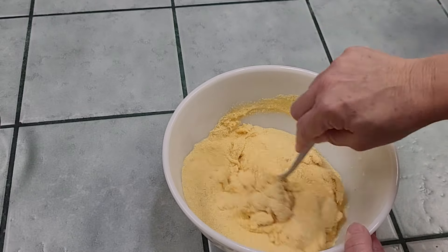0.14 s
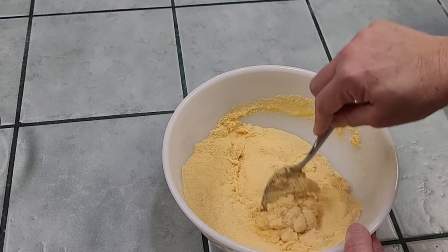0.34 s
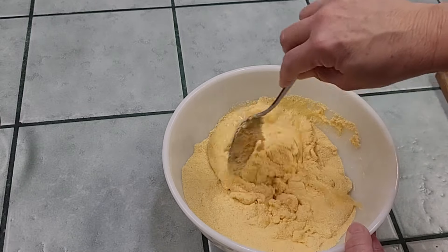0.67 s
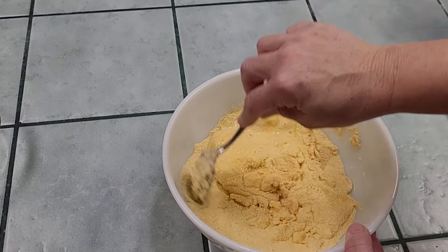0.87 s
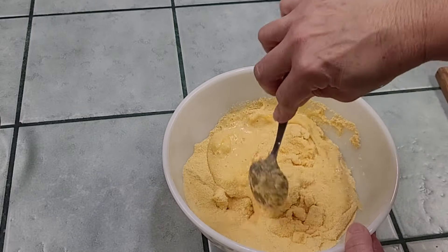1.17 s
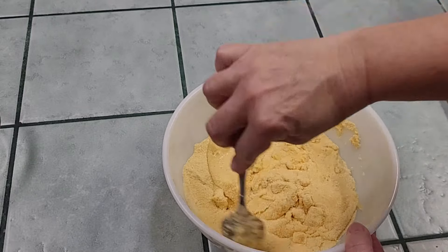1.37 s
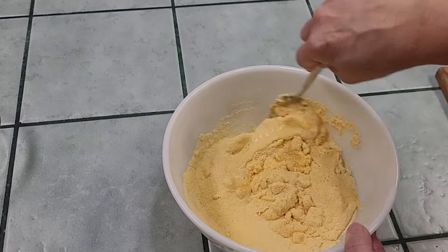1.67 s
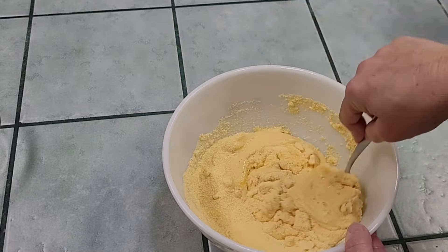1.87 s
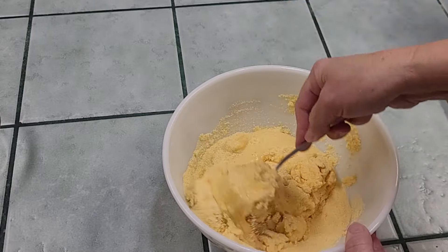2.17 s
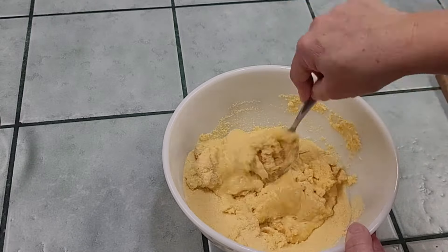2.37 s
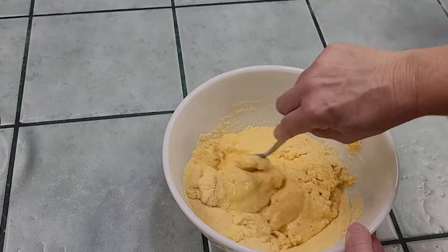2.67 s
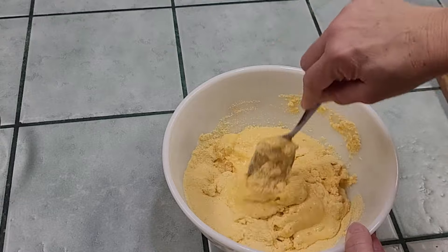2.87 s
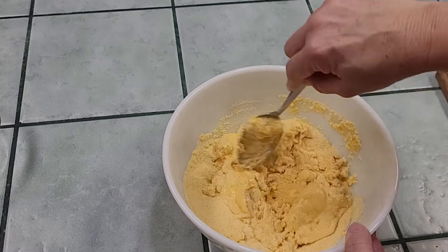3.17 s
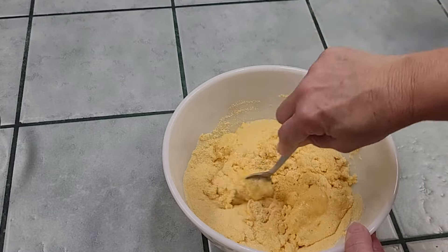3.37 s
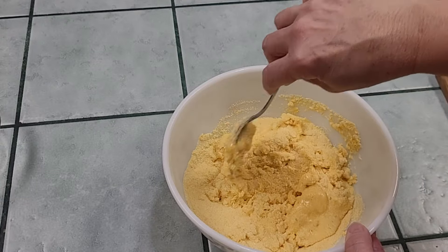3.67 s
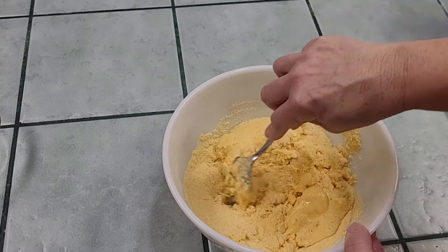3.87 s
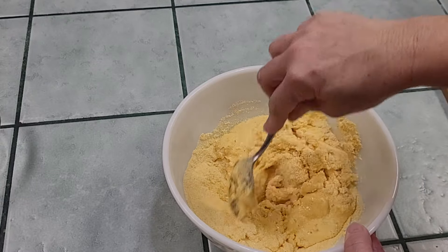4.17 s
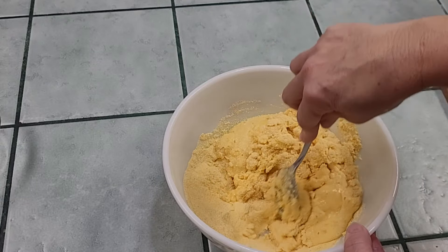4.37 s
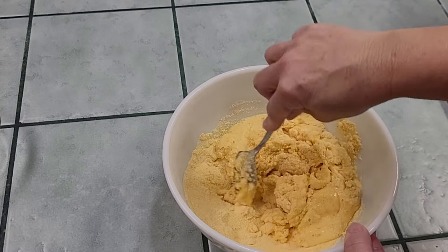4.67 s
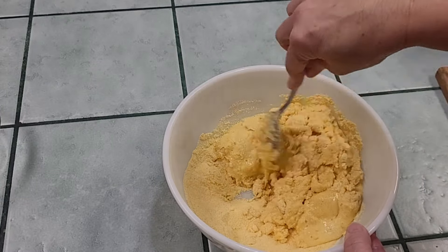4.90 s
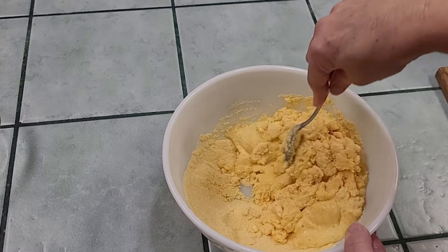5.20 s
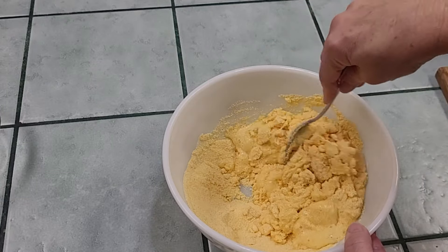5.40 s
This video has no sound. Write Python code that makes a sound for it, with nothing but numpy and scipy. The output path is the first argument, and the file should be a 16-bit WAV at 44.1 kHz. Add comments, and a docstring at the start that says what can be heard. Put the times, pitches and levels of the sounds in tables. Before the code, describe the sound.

A steel spoon stirs stiff, crumbly batter in a plastic bowl on a tiled counter, heard close on a stereo phone in a hard, reflective kitchen. From 0 to 0.6 s, low hollow knocks alternate with quick bright scrapes; sharp squealing, hissing edges come near 0.15 and 0.53 s. Another scrape and knock fall around 0.9 to 1.0 s. Small dry ticks and light brushing follow at 1.3 to 1.55 s, then a longer squealing rub swells at about 1.8 to 2.1 s. After a near pause, dull knocks land at 2.6 s, with only faint rubbing until firmer knocks with short gritty scrapes at 3.4 and 3.9 s. The loudest clunk, with a brief strong scrape, hits at 4.3 s; another duller thud follows at 4.7 s. Weak taps near 5.1 and 5.3 s and faint drags end it. Short room echoes and a quiet, low fridge hum with airy noise continue throughout.

```python
"""Stirring batter in a plastic bowl

A steel utensil stirs thick batter in a bowl on a tiled counter, close to a phone. Knocks ring decaying
modes; scrapes, squeals and drags are noise slips through resonances, shaped stroke by stroke.
A hard kitchen answers with decaying noise echoes, over shaped air noise and the sine lines of a fridge."""
import sys
import numpy as np
from scipy import signal
from scipy.fft import rfft, irfft
from scipy.io import wavfile
from scipy.ndimage import uniform_filter1d

SR = 44100
rng = np.random.default_rng(int(sys.argv[2]) if len(sys.argv) > 2 else 0)


def persist_wave(psi):
    """Save psi, clipped to +-1, as 16-bit WAV."""
    counts = np.round(np.clip(psi, -1, 1) * 32767).astype(np.int16)
    wavfile.write(sys.argv[1], SR, np.atleast_2d(counts).T)


N = 244402

# modes of bowl, counter and utensil: f/Hz, level/dB, t60/s
BOWL_MODES = [(109, -6.5, 0.49), (140, 2, 0.2), (177.7, 6, 0.13), (210.1, -0.5, 0.45), (242.8, 10.5, 0.098),
              (275.4, -4, 0.26), (321.1, 1.5, 0.2), (361, -11.5, 0.46), (417.3, -0.5, 0.14),
              (493.2, 2, 0.056), (518, 3.5, 0.05), (620.3, -2, 0.11), (697.3, -4, 0.14), (817, -5.5, 0.033),
              (1007, 4, 0.027), (1190, 2, 0.02), (1408, 3, 0.017), (1604, 1.5, 0.044), (1747, 2, 0.0076),
              (2020, -4, 0.053), (2780, 1.5, 0.062), (3063, 4.5, 0.037), (3870, 6, 0.019), (3940, 9, 0.015),
              (4080, -9.5, 0.057), (4900, -17, 0.016)]


def undb(db):
    """Amplitude ratio of a level in dB."""
    return 10 ** (np.asarray(db) / 20)


def unit(x):
    """Scale to rms 1."""
    return x / np.sqrt(np.mean(x ** 2))


def band(x, hz, width_hz):
    """Two-pole resonance, gain 1 at the centre."""
    b, a = signal.iirpeak(min(hz, .45 * SR), hz / width_hz, fs=SR)
    return signal.lfilter(b, a, x)


def walk(rate_hz):
    """Random levels held 1 / rate_hz s and slewed twice; spread near 1."""
    hold = int(SR / rate_hz)
    steps = np.repeat(rng.standard_normal(N // hold + 1), hold)
    return 1.26 * uniform_filter1d(uniform_filter1d(steps, hold), hold)[:N]


def add(out, start_s, sound):
    """Mix a short sound in at start_s."""
    i = int(start_s * SR)
    n = min(sound.shape[-1], N - i)
    out[:, i:i + n] += sound[..., :n]


def motor():
    """Fridge hum: sine lines at multiples of the turn rate, the higher ones wavering more."""
    # motor lines: multiple of turn rate, level/dB rms before wavering
    motor_lines = [(1, -86), (2, -46), (3, -60.5), (4, -61.5), (6, -67)]
    turn_hz = 27.97 * (1 + .001 * walk(2))
    turn = 2 * np.pi * np.cumsum(turn_hz) / SR
    hum = 0
    for k, db in motor_lines:
        level = undb(db + .2 * k * walk(6))
        hum = hum + level * np.sin(k * turn + rng.uniform(0, 2 * np.pi))
    return np.sqrt(2) * hum


def faint_tones():
    """Faint wavering tones in the kitchen: noise through two equal resonances in series."""
    # tones: f/Hz, width/Hz, level/dB rms before wavering
    tone_rows = [(351.3, 7.4, -73), (2750, 110, -96)]
    out = 0
    for hz, width_hz, db in tone_rows:
        tone = unit(band(band(rng.standard_normal(N), hz, width_hz), hz, width_hz))
        out = out + undb(db + 2.5 * walk(3)) * tone
    return out


def air():
    """Quiet noise of the kitchen: bass nearly alike on both ports, treble unrelated."""
    # noise spectrum: f/Hz, relative density/dB per Hz
    air_spectrum = [(20, 4), (40, -21), (70, 2), (110, -3.5), (170, 1.5), (260, -3.5), (355, -4.5),
                    (450, -16), (1000, -31), (2000, -39), (2750, -57), (4500, -47), (7000, -43),
                    (9000, -49.5), (12500, -44), (16000, -44)]
    f = np.maximum(np.arange(N // 2 + 1) * SR / N, 1)
    hz, db = np.transpose(air_spectrum)
    shape = undb(np.interp(np.log(f), np.log(hz), db))
    mid, side = rfft(rng.standard_normal((2, N))) * shape
    side = side * np.clip(f / 700, .05, 1)
    return undb(-56.5) * unit(irfft(np.array([mid + side, mid - side]), N))


def background():
    """Air, fridge and tones, leaning to the right port."""
    left_minus_right_db = -3
    lean = undb(left_minus_right_db / 2 * np.array([[1], [-1]]))
    return (air() + motor() + faint_tones()) * lean


def kitchen(x):
    """Dense echoes from hard walls, dying band by band; long waves reach both ports alike."""
    # room decay: from f/Hz, to f/Hz, t60/s, level/dB
    room_bands = [(58.7, 398, 0.51, -5.5), (540, 1770, 0.61, -5), (1890, 6400, 0.47, -6),
                  (6200, 21000, 0.72, -13.5)]
    alike_below_hz = 630
    t = np.arange(SR) / SR
    echoes = 0
    for lo_hz, hi_hz, t60_s, db in room_bands:
        sos = signal.butter(2, [lo_hz, hi_hz], "band", fs=SR, output="sos")
        noise = signal.sosfilt(sos, rng.standard_normal((2, SR)))
        # scaled so that the squared decay sums to 1
        decay = 1000 ** (-t / t60_s) * np.sqrt(2 * np.log(1000) / (t60_s * SR))
        echoes = echoes + undb(db) * noise * decay
    # the first echoes need a few milliseconds to come back
    mid, side = echoes * np.clip((t - .004) / 0.006, 0, 1)
    side = signal.sosfilt(signal.butter(2, alike_below_hz, "high", fs=SR, output="sos"), side)
    return np.array([signal.fftconvolve(x, h)[:N] for h in (mid + side, mid - side)])


def strokes(table, level_column, centre_column=None):
    """Summed level/dB of strokes that swell, hold and fade; on request also their power-weighted centre/Hz."""
    slope_db = 20  # rise and fall are the times for this many dB
    rows, t = np.array(table), np.arange(0, N + 32, 32) / SR
    full_s, rise_s, hold_s, fall_s = rows[:, :4].T[:, :, None]
    before = np.maximum(full_s - t, 0) / rise_s
    after = np.maximum(t - full_s - hold_s, 0) / fall_s
    level_db = rows[:, level_column, None] - slope_db * (before + after)
    power = undb(np.maximum(level_db, -200)) ** 2
    total = power.sum(axis=0)

    def fine(v):
        return np.interp(np.arange(N) / SR, t, v)

    db = fine(10 * np.log10(total))
    if centre_column is None:
        return db
    return db, fine(rows[:, centre_column] @ power / total)


def friction(force_db, modes, grit_db, flutter_db, apart, centre_hz=None, focus_db=0, lumpy_db=1.5):
    """Dense uneven slips ring steep resonances; the place of contact favours those near centre_hz.

    focus_db is the loss per octave away from centre_hz; apart scales the slips that differ by port."""
    press = unit(undb(grit_db * rng.exponential(size=N) + flutter_db * walk(70)))
    mid, side = rng.standard_normal((2, N)) * press * undb(force_db)
    slips = np.array([mid + apart * side, mid - apart * side])
    # the resonances share the power among them
    slips = slips / np.sqrt(np.sum(undb(np.array(modes)[:, 2]) ** 2) / 2)
    out = 0
    for k, (hz, width_hz, db) in enumerate(modes):
        drive = slips
        if centre_hz is not None:
            drive = slips * undb(-focus_db * np.abs(np.log2(centre_hz / hz)))
        # crumbs under the steel: each resonance swells and drops on its own
        drive = drive * unit(undb(lumpy_db * walk(90)))
        ring = band(band(drive, hz, width_hz), hz, width_hz)
        out = out + (-1) ** k * undb(db) * np.sqrt(SR / width_hz / 2) * ring
    return out


def drags():
    """Drags through the batter: broad resonances hiss under uneven slips."""
    # strokes: t at full force/s, rise/s, hold/s, fall/s, hiss level/dB, centre f/Hz
    drag_rows = [(0.03, 0.061, 0.045, .08, -65, 9400), (0.157, .08, 0.0032, 0.073, -45, 6640),
                 (0.22, .02, .003, 0.17, -69, 7200), (0.43, 0.12, .02, .01, -66.5, 7200),
                 (0.454, .003, 0.058, .05, -55.5, 8140), (0.528, 0.012, .002, 0.043, -45.5, 8440),
                 (0.632, 0.072, .003, 0.084, -66.5, 8700), (0.91, 0.021, 0.047, 0.094, -50.5, 8600),
                 (1.02, .03, .003, .16, -64.5, 7800), (1.331, .003, 0.064, .05, -65, 8770),
                 (1.416, .003, .003, 0.2, -59, 9100), (1.631, 0.17, .003, 0.21, -59.5, 10200),
                 (1.87, 0.24, 0.12, 0.16, -56, 7400), (2.12, .05, .003, 0.65, -86, 7300),
                 (2.294, 0.0037, .003, 0.41, -72, 9300), (2.605, 0.069, .015, .01, -73.5, 7900),
                 (2.628, .003, .003, 0.14, -66, 8200), (2.761, .2, .003, 0.18, -71, 7890),
                 (2.987, 0.21, .003, 0.093, -70.5, 7700), (3.1, .15, .07, 0.11, -71.5, 8000),
                 (3.378, 0.069, .012, .01, -69, 8350), (3.394, .003, 0.1, 0.14, -65.5, 8440),
                 (3.449, .04, .002, 0.025, -55.5, 7520), (3.857, 0.03, .012, .01, -72.5, 8060),
                 (3.871, .003, .003, 0.054, -54, 8650), (3.89, .01, 0.081, .2, -64, 8300),
                 (4.175, .1, .003, .04, -80, 7390), (4.27, .05, .025, .01, -75.5, 8390),
                 (4.298, .003, .002, .03, -55, 7950), (4.31, .005, .003, 0.25, -62.5, 7800),
                 (4.506, .03, .002, 0.046, -73, 7500), (4.718, .003, 0.044, 0.29, -64.5, 8700),
                 (5.096, 0.11, 0.13, 0.21, -70, 8540), (5.416, .035, .003, 0.12, -67, 7430),
                 (5.52, .1, .01, .1, -79, 7580)]
    # hiss resonances: f/Hz, width/Hz, level/dB
    hiss_modes = [(3030, 2560, 7), (5780, 2300, -3.5), (6940, 1400, 1), (7460, 260, -4), (7820, 1150, -1),
                  (9660, 1800, -8), (10870, 1800, 0), (12200, 3000, 0), (15000, 4300, -0.5)]
    hiss_db, hiss_hz = strokes(drag_rows, 4, 5)
    return friction(hiss_db, hiss_modes, grit_db=2, flutter_db=-0.5, apart=0.99,
                    centre_hz=hiss_hz, focus_db=6, lumpy_db=2.5)


def whistles():
    """Rings of the steel edge on a fast stroke: slips through two narrow resonances."""
    # strokes: t at full force/s, rise/s, hold/s, fall/s, level/dB
    whistle_rows = [(0.154, .05, .003, 0.031, -47), (0.538, .06, .003, 0.045, -63),
                    (1.934, 0.11, .003, 0.18, -69)]
    # steel resonances: f/Hz, width/Hz, level/dB
    whistle_modes = [(6936, 150, -4), (7200, 280, -9)]
    return friction(strokes(whistle_rows, 4), whistle_modes, grit_db=4.0, flutter_db=1, apart=0.38)


def scrapes():
    """Steel on plastic: slips squeal in the edge, grind in the wall and rumble in the bowl modes."""
    # strokes: t at full force/s, rise/s, hold/s, fall/s, edge squeal/dB, its centre f/Hz, overtone/dB,
    # wall grind/dB, its centre f/Hz, bowl wall rumble/dB, its centre f/Hz, bowl floor rumble/dB
    scrape_rows = [(0.046, .002, 0.013, .1, -59, 2330, -76, -65, 3750, -46, 1360, -40),
                   (0.11, 0.01, 0.024, 0.056, -50.5, 2400, -62, -51, 4050, -47.5, 1370, -56),
                   (0.155, .05, 0.016, 0.054, -44, 2380, -57, -48, 4170, -49, 1400, -52.5),
                   (0.453, 0.0022, 0.033, 0.053, -54.5, 2290, -72, -57, 4180, -46, 1270, -42.5),
                   (0.53, 0.022, 0.0016, 0.0095, -39, 2130, -71, -52.5, 4430, -50.5, 1460, -45),
                   (0.905, 0.0027, 0.06, 0.044, -45.5, 2530, -54, -55.5, 4020, -53, 1530, -52.5),
                   (0.969, 0.034, .002, 0.072, -57, 2450, -66, -55, 4000, -40.5, 1290, -38),
                   (1.331, .003, 0.09, 0.42, -76, 2000, -88, -65, 4100, -70.5, 1090, -63),
                   (1.416, 0.0047, 0.0017, 0.018, -75, 2100, -80, -54, 4240, -50.5, 1210, -60),
                   (1.458, 0.021, 0.019, 0.067, -64.5, 2030, -76, -59, 3570, -54.5, 1300, -63),
                   (1.65, 0.2, 0.066, 0.24, -83, 2080, -79, -75, 4270, -69.5, 1310, -78),
                   (1.799, 0.0059, .002, 0.045, -71, 2120, -78, -80, 3980, -48, 1210, -65),
                   (1.83, 0.034, 0.044, .05, -48, 2180, -63, -60, 3950, -52, 1350, -59.5),
                   (1.905, 0.062, 0.077, 0.11, -40.5, 2426, -54.5, -55, 3990, -47, 1590, -53.5),
                   (2.627, 0.0018, 0.0027, 0.07, -67, 2500, -88, -66, 3700, -51, 1190, -44.5),
                   (2.726, 0.052, .003, 0.053, -67, 2630, -85, -74, 3800, -55.5, 1220, -52.5),
                   (2.8, 0.079, .003, 0.062, -78, 2530, -91, -88, 3950, -64, 1400, -55),
                   (2.994, .07, .003, 0.082, -85, 2650, -91, -81, 4400, -72, 1450, -86),
                   (3.116, 0.13, 0.038, .03, -83, 2100, -86, -90, 4120, -74.5, 1390, -68),
                   (3.3935, .002, 0.0013, 0.011, -53, 2260, -85, -55.5, 3770, -42, 1160, -48),
                   (3.41, 0.013, 0.024, 0.074, -59.5, 2160, -83, -63.5, 3830, -54.5, 1180, -43.5),
                   (3.873, 0.0034, 0.014, 0.059, -53, 2160, -76, -52.5, 4030, -45.5, 1200, -39),
                   (3.95, 0.078, 0.044, 0.079, -69, 2220, -82, -69, 4130, -56.5, 1150, -63),
                   (4.2975, 0.0015, 0.0018, 0.011, -36, 2700, -62, -46.5, 3780, -30.5, 1250, -26),
                   (4.31, .005, 0.039, 0.11, -52.5, 2320, -68.5, -58.5, 3780, -44.5, 1240, -40),
                   (4.717, .002, 0.0019, 0.043, -78, 2240, -77, -59.5, 3750, -48.5, 1000, -55),
                   (4.77, 0.074, 0.02, 0.17, -81, 2260, -81, -74, 4100, -65.5, 1100, -57.5),
                   (5.114, 0.03, .003, 0.13, -73.5, 2020, -81, -75, 3820, -65.5, 1230, -61.5),
                   (5.2, 0.062, .02, 0.064, -86, 2080, -86, -79, 4110, -69, 1160, -77),
                   (5.274, 0.0033, .002, 0.067, -88, 2030, -93, -88, 3840, -53.5, 1040, -45),
                   (5.42, 0.055, 0.037, 0.11, -80, 2450, -85.5, -87, 4200, -76, 1090, -73)]
    # resonances under friction, each table: f/Hz, width/Hz, level/dB
    edge_modes = [(2050, 190, 4), (2260, 124, 1.5), (2463, 94, 4.5), (2628, 130, 2), (2790, 300, 5)]
    overtone_modes = [(4640, 63, 0), (4967, 280, 6), (5203, 91, -1.5), (5470, 270, -5)]
    wall_modes = [(3655, 440, 2), (3945, 200, -1), (4384, 480, 3.5)]
    body = [(hz, 6 / t60_s, db) for hz, db, t60_s in BOWL_MODES]
    upper_modes = [m for m in body if 900 < m[0] < 1850]
    lower_modes = [m for m in body if 390 < m[0] < 900]

    edge_db, edge_hz = strokes(scrape_rows, 4, 5)
    wall_db, wall_hz = strokes(scrape_rows, 7, 8)
    upper_db, upper_hz = strokes(scrape_rows, 9, 10)
    squeal = friction(edge_db, edge_modes, grit_db=0.5, flutter_db=2.5, apart=0.49,
                      centre_hz=edge_hz, focus_db=52.5)
    overtone = friction(strokes(scrape_rows, 6), overtone_modes, grit_db=1.5, flutter_db=0.5, apart=1.0)
    grind = friction(wall_db, wall_modes, grit_db=2.0, flutter_db=1.5, apart=0.75,
                     centre_hz=wall_hz, focus_db=39)
    wall_rumble = friction(upper_db, upper_modes, grit_db=2.0, flutter_db=1.5, apart=0.85,
                           centre_hz=upper_hz, focus_db=18.5)
    floor_rumble = friction(strokes(scrape_rows, 11), lower_modes, grit_db=2.0, flutter_db=1.0, apart=0.68)
    return squeal + overtone + grind + wall_rumble + floor_rumble


def ticks():
    """Ticks of steel on plastic: noise bursts of a few milliseconds, each around its own centre."""
    # ticks: t/s, level/dB, centre f/Hz
    tick_rows = [(0.5276, -28, 4280), (0.5342, -34, 4320), (1.329, -50, 4510), (1.4145, -37.5, 12000),
                 (1.4165, -38, 1300), (1.4255, -44, 3600), (1.441, -48, 1900), (1.4773, -42, 3680),
                 (1.537, -46, 3720), (2.2934, -56, 14100), (2.572, -60, 8600), (3.146, -62, 1800),
                 (3.4433, -36, 3540), (3.869, -40, 3700), (3.8906, -49, 3690), (4.3695, -69.5, 3800),
                 (4.507, -48, 4040), (5.495, -60, 3500)]
    out, t = np.zeros((2, N)), np.arange(SR // 20) / SR
    for start_s, level_db, hz in tick_rows:
        burst = rng.standard_normal(len(t)) * np.exp(-t / 0.001)
        add(out, start_s, undb(level_db) * band(burst, hz, 0.59 * hz))
    return out


def knocks():
    """Each blow rings the modes and starts with a noise crack; the left port hears it a little later."""
    # knocks: t/s, level/dB, then relative to it counter thud/dB, wall ring/dB, steel clink/dB, crack/dB;
    # left minus right/dB, favoured f/Hz
    knock_rows = [(0.044, -34.5, -7, -1.5, -21, -9, -14, 650), (0.058, -36, 3, -28, -33, -30, -2, 256),
                  (0.451, -26.5, -6.5, -8.5, -31, -15.5, -3, 275),
                  (0.474, -28.5, -36, -13, -16, -23, -10, 290), (0.907, -47, 0.5, -9, -13, -10, -4, 234),
                  (0.959, -31.5, -11.5, -19, -25, -11.5, -5.5, 312),
                  (1.344, -46, -0.5, -26, -28, -19, -5, 193), (1.416, -52.5, -3, -15, -11, 5, -14, 202),
                  (1.799, -47, -3, -13, -11, -8, -5, 625), (1.967, -47.5, -7, 8, -21, 0, -19.5, 645),
                  (2.625, -33, -2, -27, -24, -17.5, -4, 223), (2.69, -42, -11, -3, -17, -30, -6, 240),
                  (3.392, -26, -11.5, -33, -36, -21, -7, 222), (3.87, -32, -6, -13, -26, -11, -7, 455),
                  (3.889, -42.5, -33, -2, -32, -27, -7, 335), (4.296, -19, -10, -5, -18.5, -26, -5.5, 268),
                  (4.714, -29, -6, -25, -30, -25, -5, 242), (5.113, -48.5, -1.5, -9, -38, -19, -7, 226),
                  (5.236, -59.5, -4, 6, -21, -11, -9, 186), (5.272, -41, -5, -19, -40, -42, -9, 241)]
    port_lag_s = .0004
    out, t = np.zeros((2, N)), np.arange(SR // 4) / SR
    hz, mode_db, t60_s = (c[:, None] for c in np.transpose(BOWL_MODES))
    colour_hz = [230, 310, 720, 1000, 1700, 2000]
    # each mode builds up within its first cycle
    swell = np.minimum(hz * t / 0.55, 1) * 1000 ** (-t / t60_s)
    for start_s, level_db, thud_db, ring_db, clink_db, crack_db, pan_db, spot_hz in knock_rows:
        colour_db = np.interp(np.log(hz), np.log(colour_hz), [thud_db, 0, 0, ring_db, ring_db, clink_db])
        # the spot that is struck favours the modes near one pitch
        colour_db = colour_db + 7 * np.exp(-(np.log2(hz / spot_hz) / 0.33) ** 2)
        # the blow lands on either side of each mode's nodes; moving batter shifts the pitch a little
        sign, detune = rng.standard_normal((2, len(BOWL_MODES), 1))
        wave = np.sign(sign) * np.sin(2 * np.pi * hz * (1 + 0.014 * detune) * t)
        # long waves cast no shadow across the phone
        lean_db = np.minimum(hz / 450, 1) * pan_db / 2
        crack = band(rng.standard_normal(len(t)), 9300, 7700)
        crack = crack * np.exp(-t / 0.0018) * np.minimum(t / 0.00057, 1)
        for port, side, lag_s in ((0, 1, port_lag_s), (1, -1, 0)):
            gain = undb(mode_db + colour_db + side * lean_db - 10)
            ring = np.sum(gain * wave * swell, axis=0)
            blow = undb(level_db) * (ring + undb(crack_db + 6.5) * crack)
            add(out[port:port + 1], start_s + lag_s, blow)
    return out


def scene():
    """Stirring, its echoes and the background."""
    near = drags() + whistles() + scrapes() + ticks() + knocks()
    return near + kitchen(near.mean(axis=0)) + background()


def record(dry):
    """Steep elliptic low-pass: nothing is heard above 16 kHz."""
    top_hz = 16000
    return signal.sosfilt(signal.ellip(10, .2, 60, top_hz, fs=SR, output="sos"), dry)


dry = scene()
out = record(dry)
persist_wave(out)
```